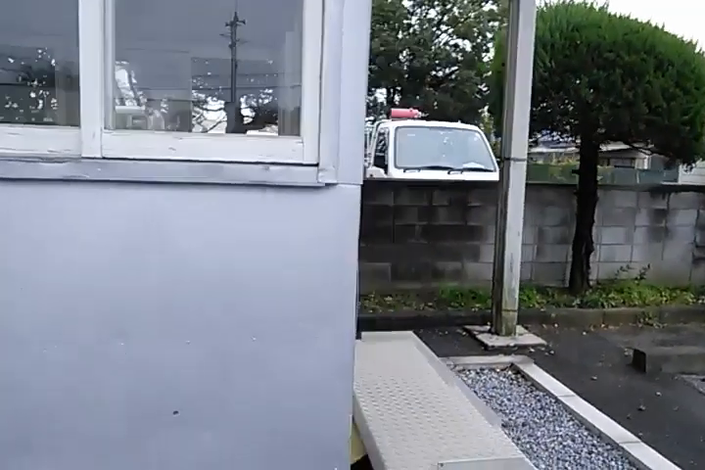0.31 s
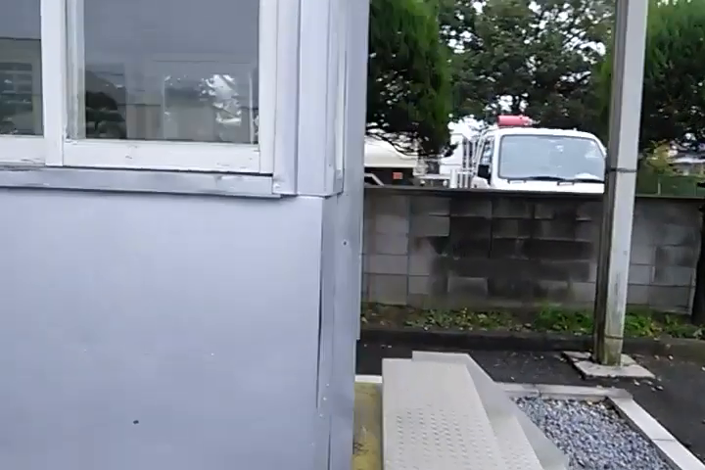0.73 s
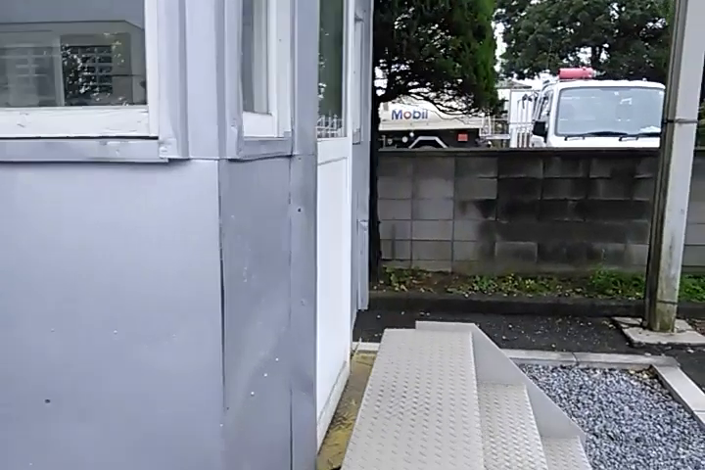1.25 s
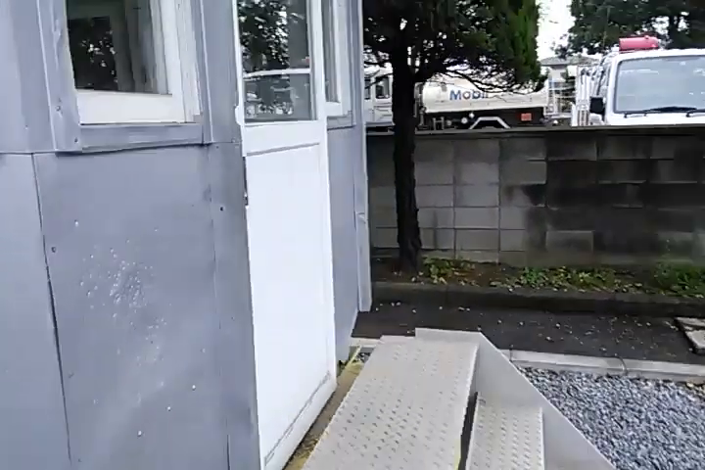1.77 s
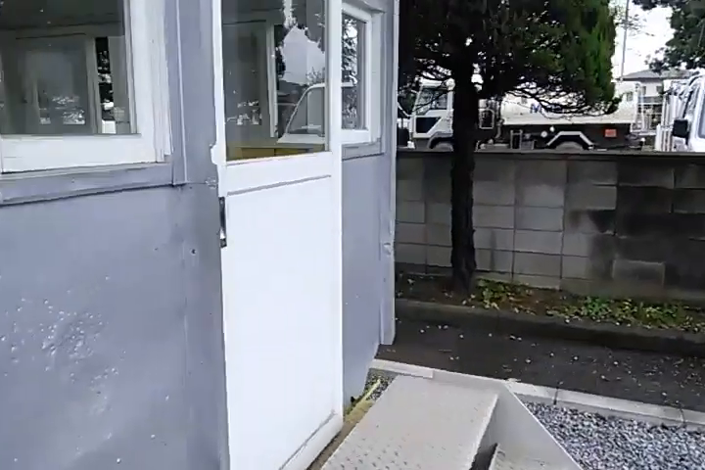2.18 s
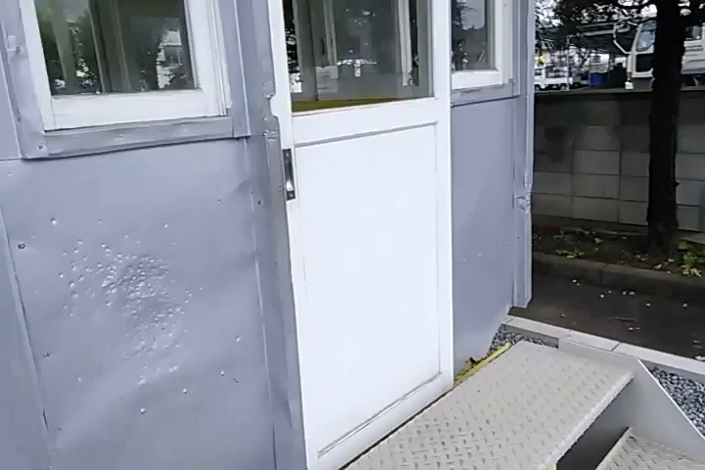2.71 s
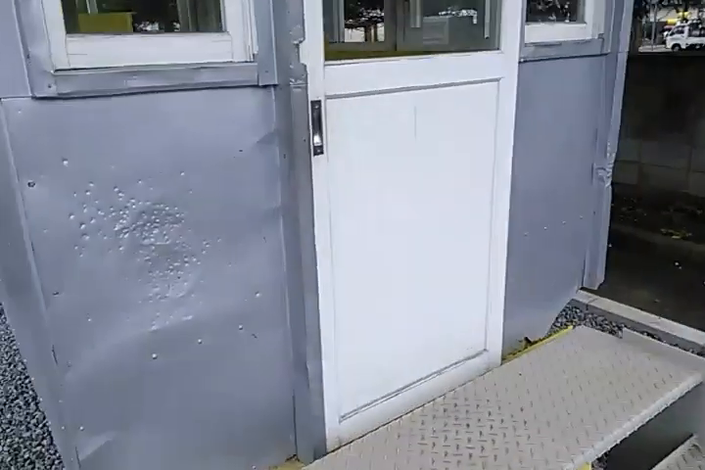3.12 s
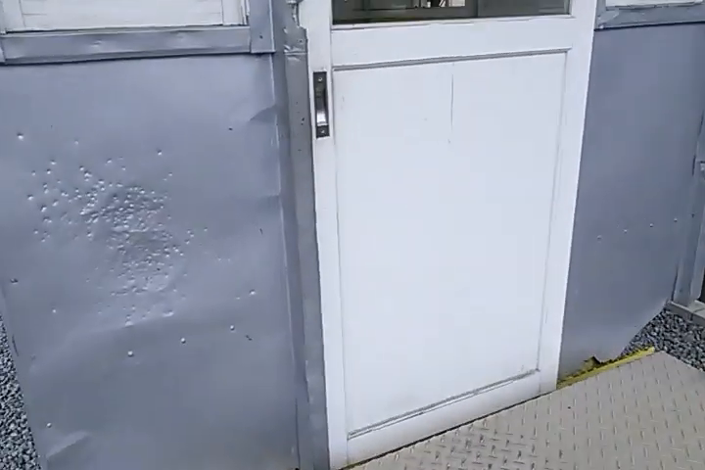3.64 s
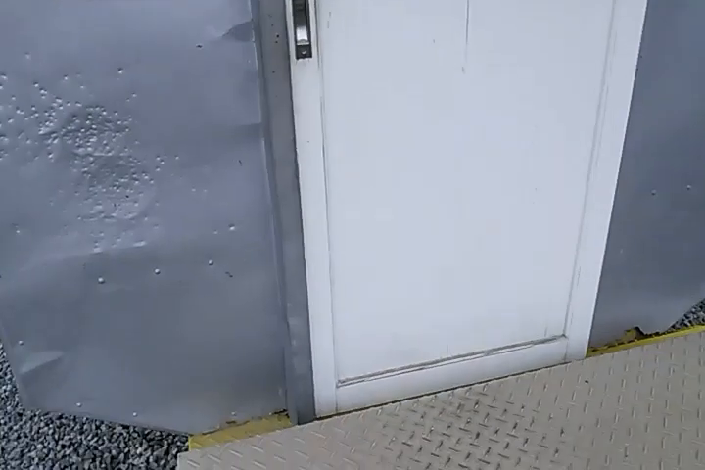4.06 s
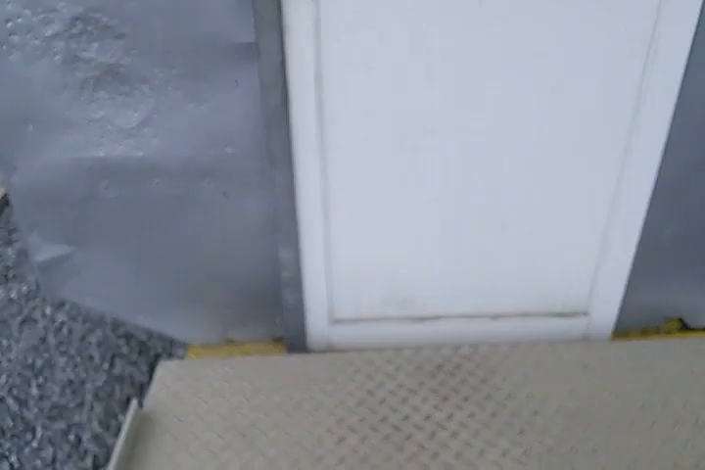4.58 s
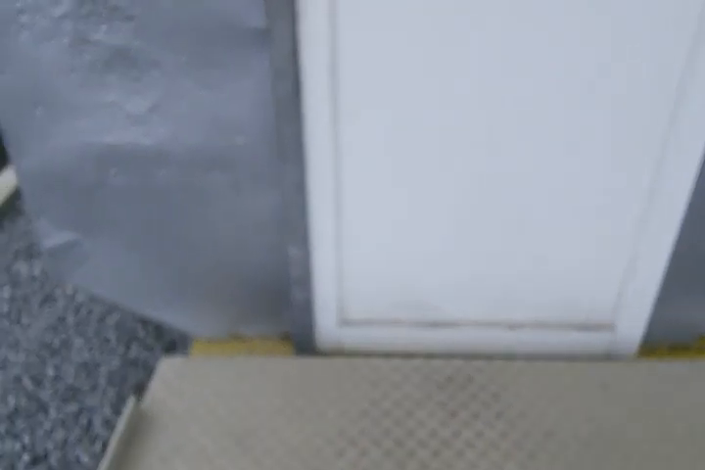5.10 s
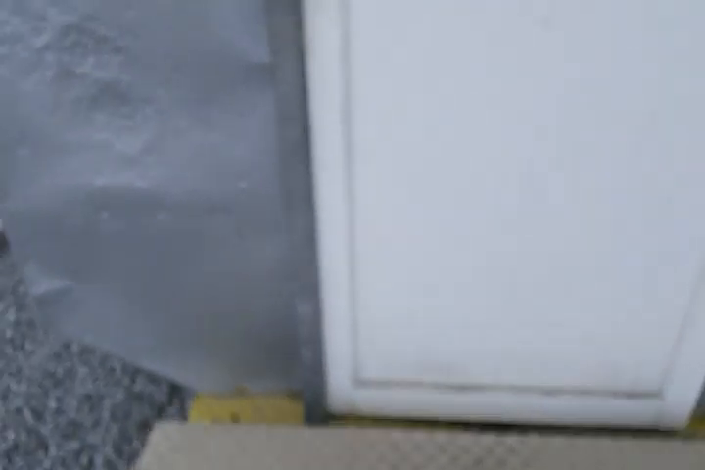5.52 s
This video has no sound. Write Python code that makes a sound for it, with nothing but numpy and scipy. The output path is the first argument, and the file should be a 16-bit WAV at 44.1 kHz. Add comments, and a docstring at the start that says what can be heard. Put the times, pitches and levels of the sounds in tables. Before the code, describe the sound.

Sharp stone knocks and gritty scuffs from unhurried steps on gravel, thin bird chirps in trees, soft far traffic, then a quiet steel plate ring.

```python
"""A faint wash of far traffic and birds comes first; then gravel crunches and clacks under slow steps
beside an old railway car, small birds chatter in the trees, and at the end a steel step plate rings.
Gravel is random clicks exciting damped resonators; each clack is a contact pulse ringing a stone.
Birds are sines along gliding pitch paths; the plate is a sum of decaying modes.
Traffic, air and rustle are coloured noise; a murmur and a hum are noise through narrow resonators."""
import sys
import numpy as np
from scipy import signal
from scipy.fft import rfft, irfft
from scipy.io import wavfile

SR = 44100
rng = np.random.default_rng(int(sys.argv[2]) if len(sys.argv) > 2 else 0)


def generate_wav(sig):
    """Save sig (samples, or channels by samples) to the path in sys.argv[1] as 16-bit PCM at SR."""
    pcm = np.round(np.clip(np.atleast_2d(sig).T, -1, 1) * 32767).astype(np.int16)
    wavfile.write(sys.argv[1], SR, pcm)


N = 253575

# Scuffs of the sole on gravel. Each row: peak time in seconds, fall time in seconds, crunch level in dB,
# rasp level and fine grit level in dB against the crunch.
SCUFFS = [(0.196, 0.31, -53, -14, -8.5), (0.256, 0.024, -38, -11, -20), (0.313, 0.052, -51, 11, -1),
          (0.434, 0.16, -71, 3, 17), (1.807, 0.096, -48.5, -19, -26), (1.844, 0.14, -46, -4, -0.5),
          (1.887, 0.029, -40, -12, -10.5), (2.01, 0.2, -46.5, -14, -12.5), (2.437, 0.13, -71, -25, 15.5),
          (2.76, 0.079, -50, -15, -4.5), (2.813, 0.11, -40.5, -16, -14), (2.954, 0.14, -47, -6.5, -3.5),
          (3.616, 0.023, -58, -1, 6.5), (3.672, 0.31, -45, -9.5, -12.5), (3.807, 0.033, -47, -0.5, -0.5),
          (3.85, 0.039, -62.5, -4, 11.5), (4.454, 0.14, -44.5, -37, -9.5), (4.699, 0.19, -54, -5, -26),
          (4.789, 0.062, -51, -14, -24), (5.224, 0.65, -53.5, -8, -13.5), (5.448, 0.05, -47.5, -38, -35)]
# Spectral weighting of the gravel's crunch, rasp and fine grit. Each row: frequency in Hz, weight in dB.
CRUNCH_SPECTRUM = [(150, -13), (264, -6), (746, -1.5), (1280, 4), (2000, -2.5), (2600, -18), (4400, -120)]
RASP_SPECTRUM = [(1200, -21), (2000, -1), (3500, -6), (5500, -7), (7000, -24.5)]
GRIT_SPECTRUM = [(2650, -14), (4500, -18.5), (6250, -14), (7260, -16), (8830, -9), (11200, -16),
                 (14200, -21.5), (16000, -44)]
# Stones knocking. Each row: start in seconds, peak level in dB, knock pitch in Hz,
# relative crack level in dB, relative low ring level in dB.
CLACKS = [(0.212, -15.5, 1560, -1, -17), (0.2516, -21, 1380, -12, -5), (0.2685, -23, 515, -30, -27),
          (0.2732, -4.5, 1360, 4, -6), (0.2738, -6.5, 683, -33, -4), (0.3207, -19, 2260, -0.5, 2),
          (0.3299, -18.5, 3560, 3, -13), (1.882, -26.5, 990, -27, -8), (1.981, -6, 712, -15.5, -2),
          (2.121, -23.5, 734, -11, -7), (2.789, -33, 815, -25, -12), (2.806, -33, 910, -22, -12),
          (2.819, -30, 1190, -28, -13), (2.948, -18.5, 1340, -22, -16), (3.68, -35.5, 900, -27, -15),
          (3.741, -33.5, 1240, -15, -2), (3.7856, -15, 440, -30, -11), (3.843, -31, 960, -18, -9),
          (4.017, -33.5, 1460, -30, -6), (4.386, -36, 1750, -16, 5), (4.443, -33.5, 455, 0, 4),
          (5.216, -31, 1250, -35, -14), (5.46, -35.5, 603, -21, -6)]
# Stone overtones. Each row: nominal frequency in Hz, relative level in dB, 60 dB decay time in seconds.
STONE_OVERTONES = [(1200, -3, 0.0024), (2250, -3.5, 0.0058), (3140, -12.5, 0.012)]
# Modes of the steel tread. Each row: frequency in Hz, level in dB against the strike,
# 60 dB decay time in seconds.
PLATE_MODES = [(382.5, 0.5, 1.3), (437, -16.5, 7.5)]
# Bird chirps, one glide each. Each row: start in seconds, length in seconds, first pitch in Hz,
# last pitch in Hz, level in dB before the flutter.
CHIRPS = [(0.451, 0.18, 4340, 4560, -59.5), (0.699, 0.02, 3600, 3680, -45.5),
          (0.722, 0.034, 4730, 5900, -51), (0.788, 0.0089, 3530, 3820, -47.5),
          (0.849, 0.054, 5100, 5470, -51), (0.875, 0.042, 3700, 3300, -48), (0.92, 0.11, 3110, 2890, -57.5),
          (0.904, 0.064, 4420, 4650, -59), (1.125, .03, 4140, 5330, -55), (1.233, 0.11, 4700, 5150, -57),
          (1.35, .06, 3400, 3850, -63), (1.377, 0.0088, 4430, 3250, -44), (1.555, 0.053, 3600, 3340, -57),
          (1.643, 0.022, 6240, 6200, -64), (2.405, 0.033, 5600, 5470, -64),
          (4.932, 0.082, 3040, 4430, -57.5), (1.375, 0.14, 3860, 4470, -53),
          (1.464, 0.033, 4160, 4360, -46.5), (1.54, 0.057, 4300, 4260, -55),
          (1.599, 0.061, 2930, 2990, -52), (1.903, 0.16, 3950, 4200, -62), (2.037, 0.064, 3940, 3850, -62),
          (2.326, 0.39, 1974, 2047, -63.5), (2.478, 0.12, 4010, 3890, -55.5),
          (2.708, 0.092, 3250, 4920, -61), (2.721, 0.029, 3290, 2970, -58), (2.846, 0.017, 3950, 3530, -59),
          (2.865, 0.042, 5400, 5140, -50), (2.947, 0.092, 3440, 4010, -46),
          (2.967, 0.066, 5000, 6550, -54.5), (3.068, 0.01, 4550, 3550, -50),
          (3.077, 0.037, 6800, 7100, -59), (3.092, 0.019, 4150, 3500, -48.5),
          (3.128, 0.014, 3800, 3270, -51), (3.218, 0.076, 3650, 4340, -48.5), (3.21, 0.06, 5740, 5700, -58),
          (3.405, 0.063, 3620, 5780, -66), (3.419, 0.028, 2610, 2820, -58),
          (3.552, 0.034, 4090, 4210, -45.5), (3.599, 0.15, 4370, 4450, -54.5),
          (4.074, 0.055, 4230, 3950, -59), (4.103, 0.012, 3510, 3210, -51.5),
          (4.149, 0.08, 2990, 3390, -64.5), (4.535, 0.097, 3560, 3700, -60), (4.555, 0.17, 3880, 6380, -61),
          (4.676, 0.037, 4080, 4360, -55), (4.938, .025, 4900, 5440, -59), (5.066, 0.021, 3050, 3400, -59),
          (5.194, 0.084, 3650, 4460, -52.5), (5.235, 0.049, 4690, 6100, -52.5),
          (5.505, 0.041, 4780, 5560, -51), (5.557, 0.071, 5670, 7040, -80),
          (5.495, 0.081, 3650, 4430, -49.5)]
# Whistles that climb, level off and drop. Each row: start in seconds, length in seconds, first pitch in Hz,
# top pitch in Hz, last pitch in Hz, level in dB before the flutter.
ARCHES = [(1.16, 0.11, 4970, 5900, 5150, -52.5), (1.26, 0.1, 4340, 6430, 5930, -52.5),
          (1.495, 0.053, 4830, 5750, 5150, -53.5), (3.304, .115, 4400, 7560, 6250, -66),
          (4.966, 0.094, 3980, 5700, 4200, -47.5)]
# Course of the far chatter blurred by the trees. Each row: time in seconds, level in dB.
FLOCK_LEVEL = [(0, -60.5), (.6, -63), (.95, -57.5), (1.5, -60.5), (2.2, -65), (2.65, -70.5), (3.1, -52),
               (3.5, -65), (4.0, -66.5), (4.5, -66.5), (4.8, -62.5), (5.3, -63), (5.75, -62)]
# Course of far traffic and air, before its small swells. Each row: time in seconds, level in dB.
TRAFFIC_LEVEL = [(0, -57.5), (.7, -61), (1.3, -55.5), (1.7, -58), (2.4, -58), (3.3, -61.5), (3.9, -58),
                 (4.25, -56.5), (4.8, -54.5), (5.3, -55), (5.75, -55)]
# Spectrum of far traffic and open air. Each row: frequency in Hz, weight in dB.
AIR_SPECTRUM = [(28, -20), (75, 0), (130, -6.5), (220, 1), (400, -1), (750, 2), (950, -3.5), (1400, -9.5),
                (2000, -11), (3300, -10.5), (5000, -22), (8000, -24.5), (15600, -22), (16000, -55)]
# A soft bright rustle comes and goes. Each row: time in seconds, level in dB.
RUSTLE_LEVEL = [(0, -74), (.6, -72.5), (1.3, -63), (1.75, -70), (2.3, -65.5), (3.4, -67), (4.0, -60),
                (4.35, -75.5), (4.8, -63), (5.75, -87)]
# A low hum swells. Each row: time in seconds, level in dB.
HUM_LEVEL = [(4.6, -63), (4.9, -63.5), (5.1, -57), (5.3, -66), (5.75, -54.5)]

# a scuff swells over a fixed time plus a share of its fall; loss over one fall
RISE_S, RISE_SHARE, FALL_DB = 0.012, 0.15, -15
# slipping stones ring briefly, each size at its own pitch
PEBBLE_LOW_HZ, PEBBLE_HIGH_HZ, PEBBLE_SIZES, PEBBLE_CYCLES = 473, 2700, 12, 7.6
STEP_S, STEP_DB = 5.466, -40.5
# power by which rises level off and falls come late; share of the length where a chirp is loudest
GLIDE_EASE, CHIRP_PEAK = 1.6, 0.85
# share of the length spent climbing; powers that level the climb off and delay the drop
ARCH_TOP, ARCH_EASE, ARCH_DROP = 0.78, 2.2, 1.4
# pitch wobble of chirps in Hz and of arches as a share, and its speed
CHIRP_WARBLE_HZ, ARCH_WARBLE, WARBLE_PER_S = 85, 0.011, 120
FLOCK_HZ, FLOCK_PER_S = 3950, 110   # nominal middle pitch and rate of the far notes
SWELL_BELOW_HZ, LOW_SWELL_DB, HIGH_SWELL_DB, SWELL_PER_S = 760, 1.5, 1, 9.8
MURMUR_HZ, MURMUR_T60_S, MURMUR_DB, MURMUR_WAVER_DB = 750, 0.025, -68, 3
HUM_HZ, HUM_T60_S = 221.5, 0.25
CUTOFF_HZ = 16500


def gravel():
    """Granular friction: slipping stones ring as damped resonators; smaller ones rasp, fine grit hisses."""
    slips = grains(800, spread_db=3.5)
    size_of_slip = rng.integers(0, PEBBLE_SIZES, N)
    rings = np.zeros(N)
    for k, hz in enumerate(np.geomspace(PEBBLE_LOW_HZ, PEBBLE_HIGH_HZ, PEBBLE_SIZES)):
        rings += ring(slips * (size_of_slip == k), hz, PEBBLE_CYCLES / hz)
    crunch = colour(rings, CRUNCH_SPECTRUM)
    rasp = colour(0.43 * slips + grains(6000, spread_db=1.5), RASP_SPECTRUM)
    grit = colour(grains(7400, spread_db=4.5), GRIT_SPECTRUM)
    t, out = np.arange(N) / SR, np.zeros(N)
    for peak, fall_s, crunch_db, rasp_db, grit_db in SCUFFS:
        rise = np.clip(1 + (t - peak) / (RISE_S + RISE_SHARE * fall_s), 0, 1)
        fall = from_db(crunch_db + FALL_DB * np.clip((t - peak) / fall_s, 0, 6))
        out += rise * fall * (crunch + from_db(rasp_db) * rasp + from_db(grit_db) * grit)
    return out


def clacks():
    """Impact of solids: a contact pulse excites a short low ring, overtones and a sharp crack."""
    out, size = np.zeros(N), 4096
    t = np.arange(size) / SR
    snap = signal.butter(2, 4000, "high", fs=SR, output="sos")
    band = signal.butter(2, [140, 13500], "band", fs=SR, output="sos")
    # each stone's overtones are shifted a little by chance
    shifts = rng.uniform(0.866, 1.088, (len(CLACKS), len(STONE_OVERTONES)))
    for (s, peak_db, hz, crack_db, low_db), shift in zip(CLACKS, shifts):
        contact = np.sin(np.pi * np.minimum(t * hz / 0.66, 1)) ** 2   # the push lasts most of a cycle
        t60 = 0.019 * (600 / hz) ** 0.18   # small stones die sooner
        low = ring(contact, 0.59 * hz, 1.3 * t60) + 0.3 * ring(contact, 0.34 * hz, 1.3 * t60)
        knock = ring(contact, hz, t60) + 0.7 * ring(contact, 1.5 * hz, 0.7 * t60)
        knock = knock - from_db(low_db) * low
        # the stone snaps free at about the height of the push
        click = 1.0 * (np.arange(size) == round(0.45 * SR / hz))
        overtones = np.zeros(size)
        for (f, db, decay_s), k in zip(STONE_OVERTONES, shift):
            overtones += from_db(db) * ring(click, f * k, decay_s)
        burst = np.exp(-abs(t - 0.45 / hz) / 0.0004)
        crack = 2.1 * signal.sosfilt(snap, rng.standard_normal(size)) * burst
        hit = knock / np.abs(knock).max() + 0.76 * overtones + from_db(crack_db) * crack
        hit = signal.sosfilt(band, hit)
        at = round(s * SR)
        out[at:at + size] -= (from_db(peak_db) * hit / np.abs(hit).max())[:N - at]
    return out


def step_plate():
    """Modal vibration: a shoe lands on the steel tread and sets its modes ringing."""
    click = np.zeros(N)
    click[round(STEP_S * SR)] = from_db(STEP_DB)
    return sum(from_db(db) * ring(click, hz, t60) for hz, db, t60 in PLATE_MODES)


def birds():
    """Frequency modulation: the nearer birds' chirps and arched whistles warble around a gliding pitch."""
    warble = drift(WARBLE_PER_S)
    return husky(chirps(warble), depth=0.55) + husky(arches(warble), depth=0.4)


def chirps(warble):
    """Eased glide: each chirp's pitch moves once from start to end, unevenly in time."""
    out = np.zeros(N)
    for s, length, start_hz, end_hz, db in CHIRPS:
        u = np.linspace(0, 1, round(length * SR))
        done = 1 - (1 - u) ** GLIDE_EASE if end_hz > start_hz else u ** GLIDE_EASE
        wobble = CHIRP_WARBLE_HZ * warble[round(s * SR):][:len(u)]
        add(out, s, start_hz + (end_hz - start_hz) * done + wobble, db, CHIRP_PEAK)
    return out


def arches(warble):
    """Arched glide: the pitch climbs, levels off at the top and drops."""
    out = np.zeros(N)
    for s, length, start_hz, top_hz, end_hz, db in ARCHES:
        u = np.linspace(0, 1, round(length * SR))
        climb = np.maximum(1 - u / ARCH_TOP, 0) ** ARCH_EASE
        drop = np.maximum((u - ARCH_TOP) / (1 - ARCH_TOP), 0) ** ARCH_DROP
        path = top_hz - (top_hz - start_hz) * climb - (top_hz - end_hz) * drop
        wobble = 1 + ARCH_WARBLE * warble[round(s * SR):][:len(u)]
        add(out, s, path * wobble, db, ARCH_TOP)
    return out


def add(out, start_s, hz, level_db, turn):
    """Phase is the integral of frequency: lay on out a sine along hz, loudest at the share turn."""
    u = np.linspace(0, 1, len(hz))
    swell = np.interp(u, [0, 0.68 * turn, turn, 1], [0.012, 0.98, 1, 0.035]) ** 0.072
    note = from_db(level_db) * swell * np.sin(2 * np.pi * np.cumsum(hz) / SR)
    at = round(start_s * SR)
    out[at:at + len(hz)] += note[:N - at]


def husky(song, depth):
    """Amplitude modulation: fast uneven flutter spreads a whistle into a band and breaks it up."""
    return song * (1 + depth * np.tanh(drift(220))) * from_db(5.5 * np.tanh(drift(45)))


def flock():
    """Diffuse sound of many sources: short gliding notes at random, blurred by their echoes."""
    out, count = np.zeros(N), round(FLOCK_PER_S * N / SR)
    for when, length, low, high, glide in rng.random((count, 5)):
        samples = round((0.0142 + 0.031 * length) * SR)
        bend = 0.328 * (glide - 0.4) * np.linspace(-1, 1, samples)
        hz = FLOCK_HZ * np.exp(0.22 * (low + high - 1.05) + bend)
        add(out, when * N / SR, hz, 0, 0.4)
    out = husky(out, depth=2.2)
    return rms_one(0.88 * out + echoes(out, 0.36)) * from_db(in_time(FLOCK_LEVEL)[0])


def traffic_and_air():
    """Broadband noise: coloured noise whose low rumble swells and sinks more than the rest."""
    air = colour(rng.standard_normal(N), AIR_SPECTRUM) * from_db(in_time(TRAFFIC_LEVEL)[0])
    low = signal.sosfilt(signal.butter(1, SWELL_BELOW_HZ, fs=SR, output="sos"), air)
    low_swell = from_db(LOW_SWELL_DB * drift(SWELL_PER_S))
    high_swell = from_db(HIGH_SWELL_DB * drift(SWELL_PER_S))
    return low * low_swell + (air - low) * high_swell


def murmur():
    """Narrow-band noise: a damped resonator driven by noise comes and goes in level."""
    tone = rms_one(ring(rng.standard_normal(N), MURMUR_HZ, MURMUR_T60_S))
    return tone * from_db(MURMUR_DB + MURMUR_WAVER_DB * drift(16))


def rustle():
    """Filtered noise: the bright spectrum of the fine grit, soft and slowly varying."""
    return colour(rng.standard_normal(N), GRIT_SPECTRUM) * from_db(in_time(RUSTLE_LEVEL)[0])


def hum():
    """Resonance under random drive: a sharp resonator gives a low tone that wavers by chance."""
    tone = rms_one(ring(rng.standard_normal(N), HUM_HZ, HUM_T60_S))
    return tone * from_db(in_time(HUM_LEVEL)[0]) * gate(HUM_LEVEL, fade_s=0.47)


def background():
    """Superposition: far birds, murmur, far traffic and air, rustle and hum add up."""
    return flock() + murmur() + traffic_and_air() + rustle() + hum()


def ring(clicks, hz, t60):
    """Damped resonator: a unit click sets a sine of starting height 1 ringing, 60 dB down after t60."""
    r, w = from_db(-60 / (t60 * SR)), 2 * np.pi * hz / SR
    return signal.lfilter([0, np.sin(w)], [1, -2 * r * np.cos(w), r * r], clicks + 1e-18)


def grains(per_s, spread_db):
    """Random point process: clicks of uneven size and either sign, in clumps."""
    born = rng.random(N) < per_s * from_db(3.5 * drift(60)) / SR
    sizes = from_db(spread_db * np.minimum(rng.exponential(1, N), 4))
    return born * sizes * rng.choice([-1, 1], N)


def echoes(x, t60):
    """Diffuse scatter from walls and trees: convolution with a dying noise tail of unit energy."""
    tail = rng.standard_normal(SR) * from_db(-60 * np.arange(SR) / SR / t60)
    return signal.fftconvolve(x, tail / np.sqrt(np.sum(tail ** 2)))[:N]


def colour(x, spectrum):
    """Linear filtering: weight x by a spectrum drawn over log frequency, then scale to rms 1."""
    hz, db = np.transpose(spectrum)
    grid = np.maximum(np.arange(N // 2 + 1) * SR / N, 1)
    gain = from_db(np.interp(np.log(grid), np.log(hz), db))
    return rms_one(irfft(rfft(x) * gain, N))


def drift(rate):
    """Low-passed noise: slow chance of rms 1; a higher rate in Hz moves faster."""
    r = np.exp(-2 * np.pi * rate / SR)
    noise = rng.standard_normal(N + SR)   # the first second lets the filter settle
    return rms_one(signal.lfilter([1], [1, -2 * r, r * r], noise)[SR:])


def in_time(rows):
    """Linear interpolation: columns of a table at every sample."""
    s, *columns = np.transpose(rows)
    return [np.interp(np.arange(N) / SR, s, c) for c in columns]


def gate(rows, fade_s):
    """Envelope: one over the table's time span, fading to zero outside."""
    t0, t1 = rows[0][0], rows[-1][0]
    return np.interp(np.arange(N) / SR, [t0 - fade_s, t0, t1, t1 + fade_s], [0, 1, 1, 0])


def from_db(db):
    """Logarithmic level: decibels to amplitude gain."""
    return 10 ** (np.asarray(db) / 20)


def rms_one(x):
    """Mean-square normalisation: scale to unit rms."""
    return x / np.sqrt(np.mean(x ** 2) + 1e-20)


def scene():
    """Direct plus scattered sound: steps with a short slap off the car side, birds blurred by distance."""
    near, song = gravel() + clacks(), birds()
    out = near + from_db(-16) * echoes(near, 0.097) + step_plate()
    out += song + from_db(-6.5) * echoes(song, 0.27)
    out += background()
    return out[None]


def record(dry):
    """Band limiting: a steep low-pass, 60 dB down from the cutoff up, removes the top."""
    return signal.sosfilt(signal.cheby2(14, 60, CUTOFF_HZ, fs=SR, output="sos"), dry)


dry = scene()
out = record(dry)
generate_wav(out)
```